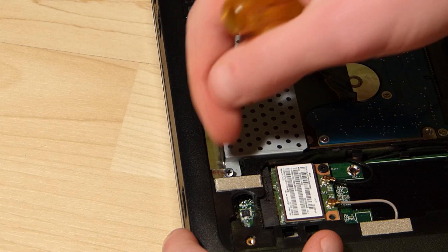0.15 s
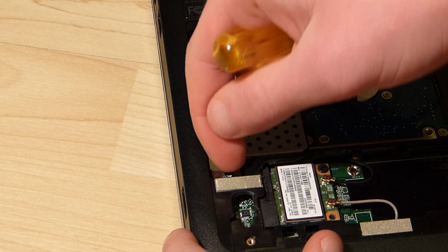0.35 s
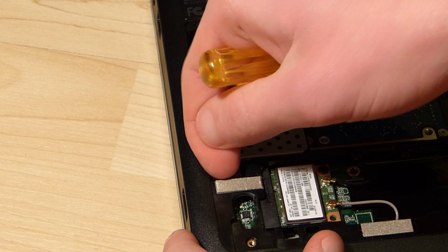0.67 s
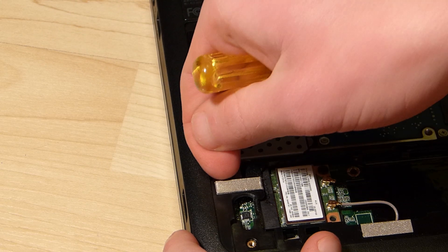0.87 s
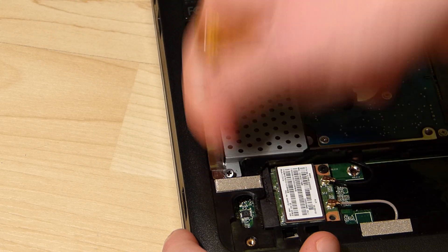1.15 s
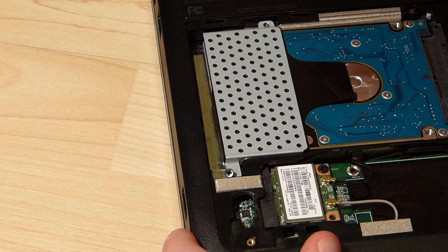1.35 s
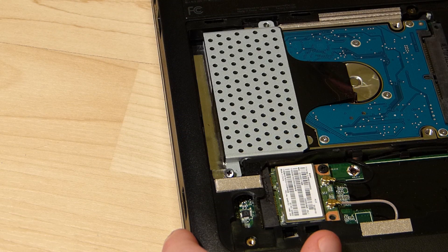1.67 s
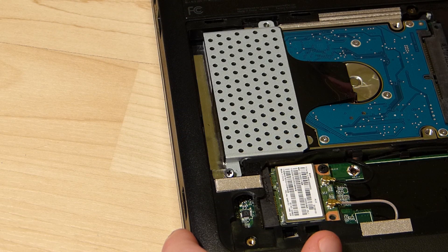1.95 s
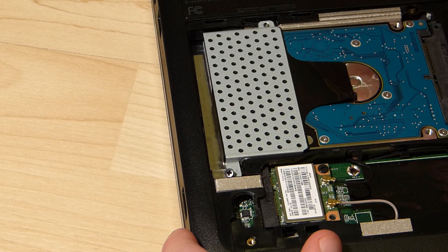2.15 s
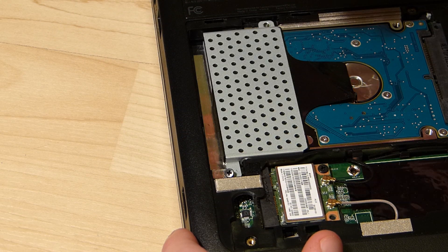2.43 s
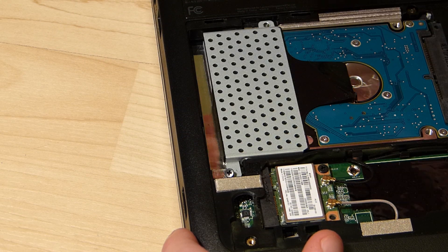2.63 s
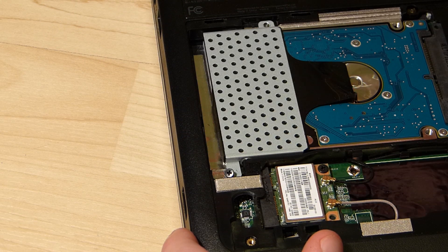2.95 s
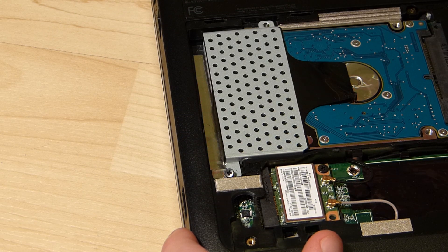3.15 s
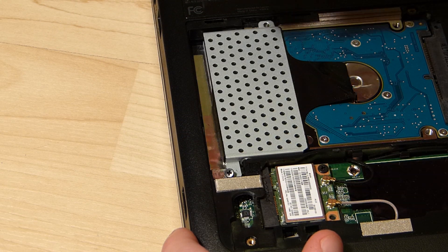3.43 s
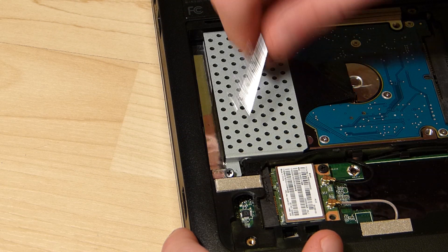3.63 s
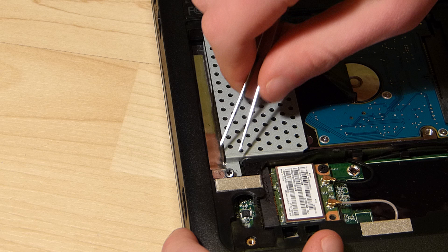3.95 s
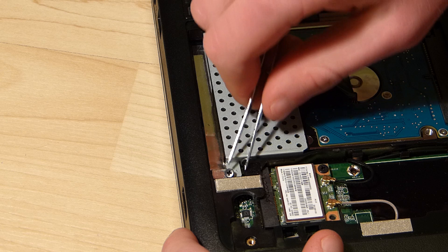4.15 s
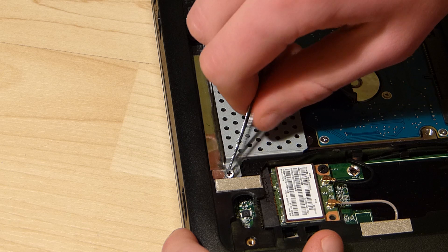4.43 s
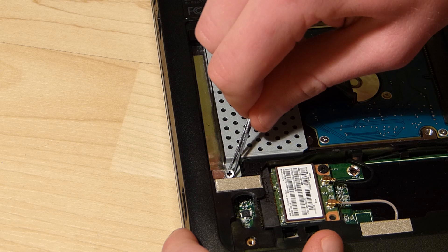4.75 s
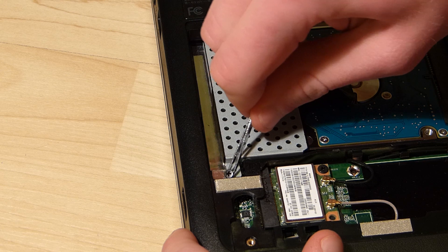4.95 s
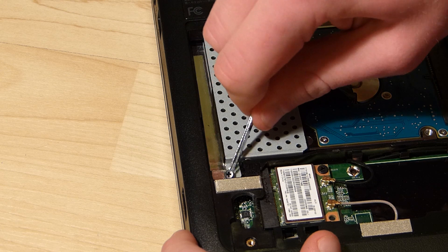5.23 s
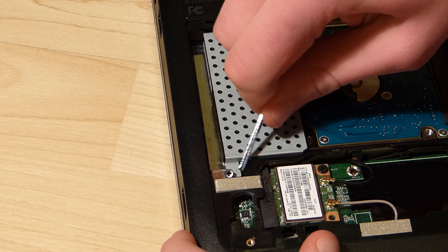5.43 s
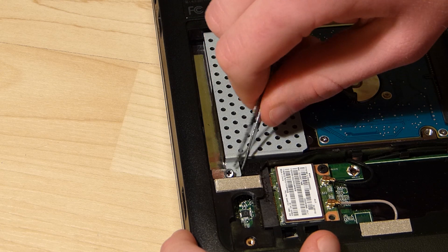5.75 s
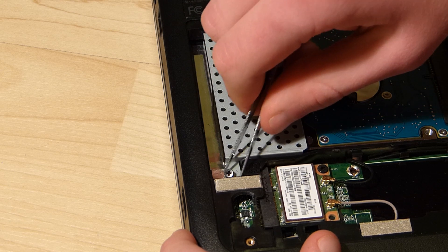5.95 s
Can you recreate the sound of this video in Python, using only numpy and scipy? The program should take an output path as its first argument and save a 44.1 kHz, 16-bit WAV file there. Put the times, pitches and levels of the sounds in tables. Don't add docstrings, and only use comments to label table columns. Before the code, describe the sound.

In a quiet room with faint fan hum, a screwdriver clacks down and rolls briefly on wood, then tiny tweezer ticks touch a screw and bracket.

```python
import sys
import numpy as np
from scipy import signal
from scipy.fft import rfft, irfft
from scipy.io import wavfile
from scipy.ndimage import uniform_filter1d

SR = 44100
rng = np.random.default_rng(int(sys.argv[2]) if len(sys.argv) > 2 else 0)


def level_to_linear(level):
    exponent = np.asarray(level, float) / 20
    return 10 ** exponent


def log_audio(samples):
    frames = np.atleast_2d(samples).T
    limited = np.clip(frames, -1, 1)
    pcm = np.round(limited * 32767).astype(np.int16)
    wavfile.write(sys.argv[1], SR, pcm)


N = 268569


# (time [s], handle knock peak [dB], snap [dB], shaft ring [dB], handle ring [dB])
BOUNCES = [(1.605, -15.5, -7.5, -27.5, -70), (1.6175, -27, -11.5, -20, -59), (1.65, -24, -14, -24, -62),
           (1.677, -28, -24, -22.5, -64), (1.694, 3, -26, -17, -55), (1.7055, -2.5, -7, -20, -25.5),
           (1.737, -20, -37, -23.5, -36), (1.758, -27, -43, -26, -40), (1.8791, -4.5, -13.5, -40, -36),
           (1.9188, 0, -36, -44, -38), (1.944, -7, -40.5, -37, -39), (1.965, -23, -40.5, -25, -37),
           (1.992, -46, -44.5, -28.5, -42)]
# (pitch [Hz], width [Hz], level [dB])
KNOCK = [(1940, 450, -3), (3010, 660, 4), (4300, 1300, -7.5), (890, 400, -25), (456.4, 178.9, -20.5)]
# (pitch [Hz], level [dB], t60 [s])
HANDLE = [(2695, 0, 0.2), (2740, -13.5, 0.36), (3850, -7.5, 0.17), (2355, -12.5, .15), (1441, -10, 0.28),
          (1171, -12.5, 0.21)]


def screwdriver():
    s, knock_db, snap_db, low_db, handle_db = np.transpose(BOUNCES)
    high_db = low_db + np.where(s < 1.72, 4.5, -4)
    rattle, shaken = chatter()
    steel = shaft(blows(s, low_db) + shaken, blows(s, high_db) + shaken)
    knocks = 0.36 * body(blows(s, knock_db), KNOCK)
    plastic = band(knocks + chime(blows(s, handle_db), HANDLE), 700, 6000)
    jolt = level_to_linear(-8.5) * band(blows(s, knock_db) + 1.5 * blows(s, snap_db), 15, 60, order=1)
    return steel, jolt + sides(plastic + snaps(s, snap_db) + rattle, -1.7)


# (frequency [Hz], level [dB])
SNAP_COLOUR = [(880, -45), (1500, -9.5), (2120, -8), (2880, -20), (4830, 1), (10300, -15), (11300, -16),
               (15400, -26.5), (16000, -27)]


def snaps(times, levels_db):
    out = np.zeros(N)
    for start, db in zip(times, levels_db):
        snap = band(crack(SNAP_COLOUR, decay_s=.0018), 1500, 15500)
        out[round(start * SR):][:CONTACT] += level_to_linear(db) * snap
    return out


# (pitch [Hz], level [dB], t60 [s])
SKIPPING = [(4720, 0.5, 0.34), (4885, -5.5, .12), (5340, -1.5, 0.03), (7865, -3, 0.13), (8026, -4.5, 0.1),
            (11100, -5.5, .12), (11670, -13, .1), (14980, -12, .2)]
# (pitch [Hz], level [dB], t60 [s])
LYING = [(4673, -3, 0.23), (4710, -13, 0.17), (7770, -2.5, 0.093), (7820, -4.5, .13), (7867, -7.5, .1),
         (11140, -18, 0.18), (11240, -18.5, 0.17), (14666, -22.5, 0.16)]


def shaft(low, high):
    lying = np.arange(N) > 1.67 * SR
    main, top = np.zeros(N), np.zeros(N)
    for modes, when in ((SKIPPING, ~lying), (LYING, lying)):
        for mode in modes:
            hz = mode[0]
            rung = chime((high if hz > 6500 else low) * when, [mode])
            if hz < 12000:
                main += rung
            else:
                top += rung
    steel = band(main, 3800, 11700, order=6) + band(top, 14300, 15300)
    flutter_db, flutter_s = 3.5, .006
    size = round(flutter_s * SR)
    waver = uniform_filter1d(uniform_filter1d(rng.standard_normal(N), size), size)
    steel = steel * level_to_linear(flutter_db * evened(waver))
    return np.array([steel, 0.61 * steel + .55 * np.roll(steel, 1)])


# (start [s], length [s], level [dB], brightness [0-1])
ROLL = [
    (1.605, 0.048, -29, .7),
    (1.688, .17, -22, 0.2),
    (1.872, 0.0294, -25, 0.59),
    (1.917, 0.072, -25, 0.05),
]
# (frequency [Hz], level [dB])
CHATTER_COLOUR = [(290, -32), (500, -6), (1340, -5), (1900, -4.5), (2200, -4), (4370, -3), (5210, -2),
                  (11200, -18), (12500, -57.5), (16200, -87), (22000, -120)]


def chatter():
    grit = evened(taps_at_random(rate=2500, spread_db=3.5, most=3.5))
    bouts = np.array([grit * stroke(*row[:3], rise_s=.012, sag=112, release=430) for row in ROLL])
    bright = np.array([row[3] for row in ROLL])
    rattle = colour((1 - bright) @ bouts, CHATTER_COLOUR) + colour(bright @ bouts, TICK_COLOUR)
    shaft_share_db = -25.5 + 11 * bright
    shaken = .08 * level_to_linear(shaft_share_db) @ bouts
    return band(rattle, 400, 10800, order=6), shaken


# (start [s], length [s], level [dB], lowest mode share [dB])
RUMBLE = [
    (1.585, 0.14, -53, -34),
    (1.68, .08, -49, -30.5),
    (1.786, 0.054, -35.5, -12.5),
    (1.892, 0.072, -43.5, -38),
]
# (pitch [Hz], width [Hz], level [dB])
DESK = [(420, 230, -2.5), (502, 50, 10), (640, 41, 1), (850, 59, -8)]


def desk():
    a, b = rng.standard_normal((2, N))
    top = evened(body(a, DESK))
    lowest = evened(ring(ring(b, 185, 13), 185, 13))
    boom = np.zeros(N)
    for start, length, db, lowest_db in RUMBLE:
        gain = stroke(start, length, db, rise_s=.02, sag=37, release=180)
        boom += gain * (top + level_to_linear(lowest_db) * lowest)
    return sides(band(boom, 160, 1200), -3.0)


# (time [s], tick peak [dB], ringing pitch [Hz], case knock against the tick [dB])
TICKS = [(1.107, -18, 8560, -6.5), (1.563, -37, 7800, -24), (2.4802, -44.5, 4900, -8),
         (2.9266, -43.5, 8230, -21), (3.2792, -47, 7330, -11), (4.2812, -51.5, 7000, -9.5),
         (4.3142, -40, 8420, -12.5), (4.338, -46, 4900, -9.5), (4.4173, -44, 5960, -0.5),
         (4.5022, -50, 5750, -12), (4.5164, -50, 5750, -6.5), (4.5965, -42, 4400, -5),
         (4.6465, -29, 8050, -19.5), (5.154, -42, 4900, -15.5), (5.2588, -37, 8200, -22),
         (5.3815, -47.5, 4140, -16.5), (5.392, -49, 3130, -10.5), (5.4148, -45, 7030, -10),
         (5.4317, -46, 7000, -19), (5.526, -55.5, 6760, -9), (5.9092, -51, 7710, -5),
         (6.008, -49, 7000, -5.5), (6.0247, -46, 3940, -11.5)]
# (time [s], level, ring peaks 14.5 dB above [dB],
# pitch [Hz])
CLEAR_RINGS = [
    (5.2592, -61, 2480),
    (5.383, -63, 2800),
    (5.405, -69, 1660),
    (5.3965, -62, 3400),
    (3.405, -70, 1550),
    (5.2595, -47, 8100),
    (4.6465, -51, 7800),
    (4.4178, -57, 6000),
    (5.4335, -58, 7100),
]
# (frequency [Hz], level [dB])
TICK_COLOUR = [(1200, -23.5), (2200, -10.5), (3500, -8.5), (5000, -3.5), (8500, -3), (10500, -8.5),
               (12500, -15.5), (16000, -27.5)]
# (pitch [Hz], width [Hz], level [dB])
CASE = [(1450, 670, 6), (850, 420, -9.5), (2300, 500, 1.5), (463, 120, -13.5)]


def ticks():
    out = np.zeros((2, N + CONTACT))
    impact = signal.unit_impulse(CONTACT)
    knock = band(body(impact, CASE), 400, 5000)
    contacts = [(*row, -6.5) for row in TICKS]
    contacts += [(*row, -30, 14.5) for row in CLEAR_RINGS]
    for s, db, hz, case_db, patch_db in contacts:
        patch = ring(ring(impact, hz, .2 * hz), hz, .2 * hz)
        sound = .8 * crack(TICK_COLOUR, decay_s=0.005)
        sound += level_to_linear(patch_db) * patch / abs(patch).max()
        sound += level_to_linear(case_db - 5.0) * knock
        lean_db = -4 if 1.3 < s < 3.6 else -.8
        out[:, round(s * SR):][:, :len(sound)] += sides(level_to_linear(db) * sound, lean_db)
    return out[:, :N]


# (start [s], length [s], level [dB])
RUSTLE = [
    (2.095, 0.11, -58),
    (2.255, 0.21, -63),
    (2.45, 0.26, -59.5),
    (3.079, 0.38, -71),
    (3.258, .04, -71.5),
    (5.36, 0.07, -70),
    (5.86, .12, -76),
    (5.99, .04, -67),
]
# (frequency [Hz], level [dB])
RUSTLE_COLOUR = [(180, -44), (300, -21), (497, 2), (714, -8), (949, 0.5), (3620, -15.5), (7850, -12.5),
                 (13000, -27.5)]


def rustle():
    grit = evened(taps_at_random(rate=5000, spread_db=1.0))
    slides = sum(stroke(*row, rise_s=.03, sag=7.3, release=180) for row in RUSTLE)
    return sides(colour(grit, RUSTLE_COLOUR) * slides, -1.3)


# (delay [s], left gain [x], right gain [x])
ECHOES = [(.0012, 0.52, -.2), (.0031, -.2, .3), (.0065, 0.27, .1), (0.0119, .3, .35), (0.0138, -.15, .25)]
# (frequency [Hz], t60 [s])
ROOM = [(200, 0.33), (1000, 0.38), (4000, .32), (8000, 0.36), (11000, 0.067), (13000, 0.14)]


def room(x):
    size = SR // 2
    taps = np.zeros((2, size))
    at = np.arange(100, size - 20, 20) + rng.integers(0, 20, (2, (size - 101) // 20))
    np.put_along_axis(taps, at, rng.choice([-1., 1.], at.shape), 1)
    taps += 0.2 * taps[::-1]
    hz, t, z = signal.stft(taps, SR, nperseg=256)
    tail = signal.istft(z * level_to_linear(-60 * t / read(ROOM, hz)[:, None]), SR, nperseg=256)[1]
    tail /= np.linalg.norm(tail[0])
    for delay_s, *gains in ECHOES:
        tail[:, round(delay_s * SR)] += gains
    return signal.fftconvolve(x, tail, axes=1)[:, :N]


# (frequency [Hz], level per Hz [dB])
AIR = [(25, -8), (60, -9.5), (125, -9), (200, -5), (270, -0.5), (420, 0), (650, 0.5), (1000, -2),
       (1600, -5.5), (2500, -13.5), (4000, -14.5), (6300, -16.5), (10000, -20), (15500, -26)]
# (frequency [Hz], likeness [-1 to 1])
SAME = [(60, 1), (180, -0.11), (550, -0.46), (1650, 0.0), (4970, 0.28), (15000, 0.17)]
# (frequency [Hz], left minus right [dB])
LEAN = [(60, 0.0), (240, -0.5), (950, -1.7), (3770, -0.88), (15000, -0.5)]
# (pitch [Hz], level [dB])
FAN = [(678.3, -73.5), (1287, -75.5), (5760, -86)]


def air():
    frames, hz = N // 256 + 5, np.fft.rfftfreq(1024, 1 / SR)
    a, b, c, d, patches = rng.standard_normal((frames, 513, 5)).T
    patches = evened(uniform_filter1d(uniform_filter1d(patches, 10, 0), 14, 1))
    same = np.clip(read(SAME, hz), -1, 1)[:, None]
    left = a + 1j * b
    right = same * left + np.sqrt(1 - same ** 2) * (c + 1j * d)
    lean_db = np.array([.5, -.5])[:, None, None] * read(LEAN, hz)[:, None]
    z = np.array([left, right]) * level_to_linear(read(AIR, hz)[:, None] + 0.4 * patches + lean_db)
    hiss = level_to_linear(-58.5) * evened(signal.istft(z, nperseg=1024, noverlap=768)[1][:, :N])
    fan = sum(level_to_linear(db) * evened(ring(rng.standard_normal(N), f, 1.2)) for f, db in FAN)
    return hiss + fan


def evened(x):
    return x / np.sqrt(np.mean(x ** 2) + 1e-20)


def read(points, hz):
    f, value = np.transpose(points)
    return np.interp(np.log(hz + 1), np.log(f + 1), value)


def colour(x, spectrum):
    hz = abs(np.fft.fftfreq(1024, 1 / SR))
    log_gain = np.log(level_to_linear(np.maximum(read(spectrum, hz), -70)))
    taps = np.fft.ifft(np.exp(np.conj(signal.hilbert(log_gain)))).real[:512]
    return signal.oaconvolve(x, taps / np.linalg.norm(taps))[:len(x)]


def band(x, low_hz, high_hz, order=4):
    sos = signal.butter(order, [low_hz, high_hz], "bandpass", fs=SR, output="sos")
    return signal.sosfilt(sos, x)


def ring(x, hz, width):
    pole = np.exp((2j * np.pi * hz - np.pi * width) / SR)
    return signal.lfilter([1], [1, -pole], x).imag


def body(x, resonances):
    return sum(level_to_linear(db) * ring(x, hz, width) for hz, width, db in resonances)


def chime(x, modes):
    end = round(2.6 * SR)
    t = np.arange(end) / SR
    rung = np.zeros(end)
    for hz, db, t60 in modes:
        energy = signal.lfilter([1], [1, -level_to_linear(-120 / t60 / SR)], x[:end] ** 2)
        rung += level_to_linear(db) * np.sqrt(energy) * np.sin(2 * np.pi * hz * t)
    return np.pad(rung, (0, N - end))


def blows(times, db):
    x = np.zeros(N)
    x[np.round(np.asarray(times) * SR).astype(int)] = level_to_linear(db)
    return x


def taps_at_random(rate, spread_db, most=np.inf):
    struck = rng.random(N) < rate / SR
    strength = level_to_linear(spread_db * np.minimum(rng.exponential(1, N), most))
    return struck * strength * rng.choice([-1, 1], N)


CONTACT = 2000


def crack(colours, decay_s):
    fade = np.exp(-np.arange(CONTACT) / SR / decay_s)
    slips = rfft(rng.standard_normal(CONTACT) * fade)
    x = colour(irfft(slips / abs(slips)) * np.sqrt(fade), colours)
    return x / abs(x).max()


def stroke(start, length, db, rise_s, sag, release):
    t = np.arange(N) / SR - start
    fall_db = sag * np.clip(t, 0, length) + release * np.maximum(t - length, 0)
    return np.clip(t / rise_s, 0, 1) * level_to_linear(db - fall_db)


def sides(x, lean_db):
    return x * level_to_linear(np.array([[.5], [-.5]]) * lean_db)


def scene():
    (steel, tool), table, tips, cloth = screwdriver(), desk(), ticks(), rustle()
    sent = level_to_linear(-7) * steel + level_to_linear(-5) * tool + level_to_linear(-3.0) * table + level_to_linear(-2.5) * tips + level_to_linear(-1.0) * cloth
    return steel + tool + table + tips + 0.49 * cloth + room(sent) + air()


def low_pass(x):
    return signal.sosfilt(signal.butter(12, 16530, fs=SR, output="sos"), x)


def record(dry):
    edge = signal.firwin(255, 16000, fs=SR)[None]
    mix = signal.oaconvolve(dry, edge, "same") - .0028
    return low_pass(mix)


dry = scene()
out = record(dry)
log_audio(out)
```